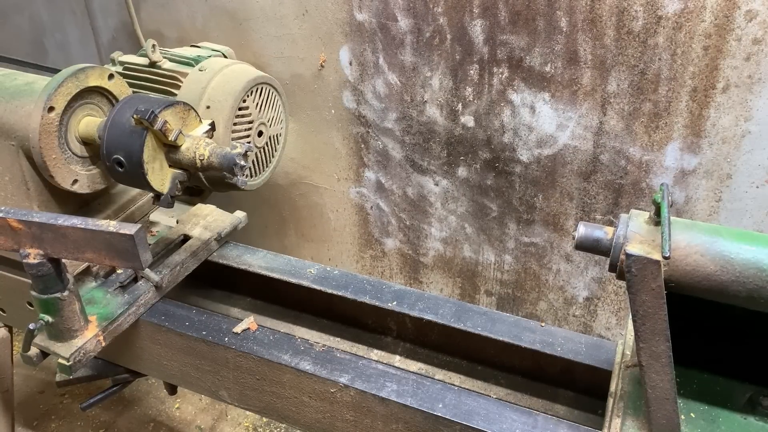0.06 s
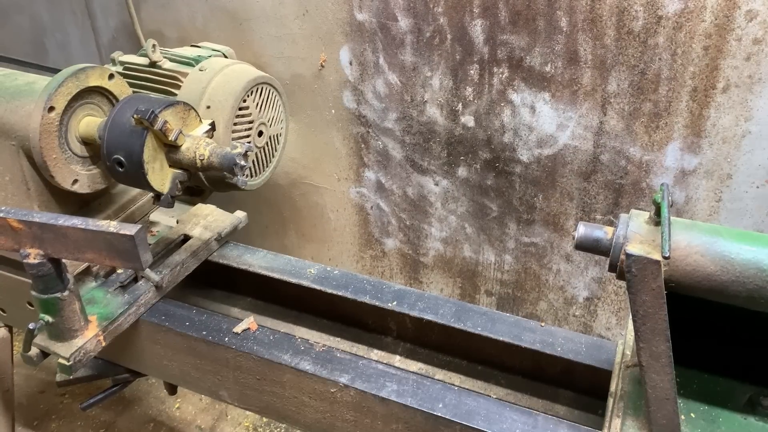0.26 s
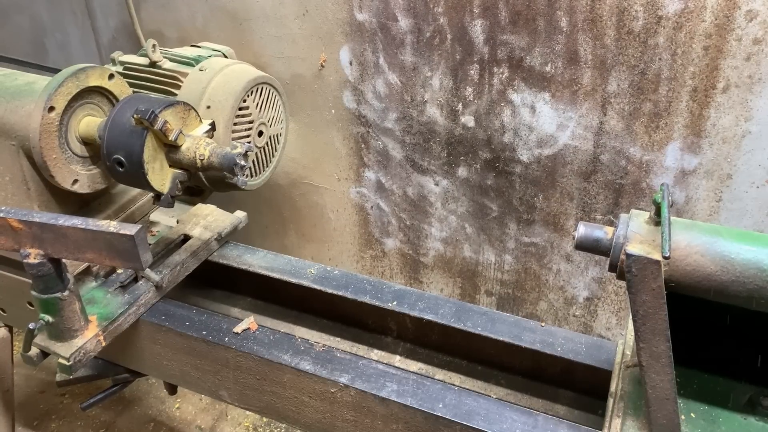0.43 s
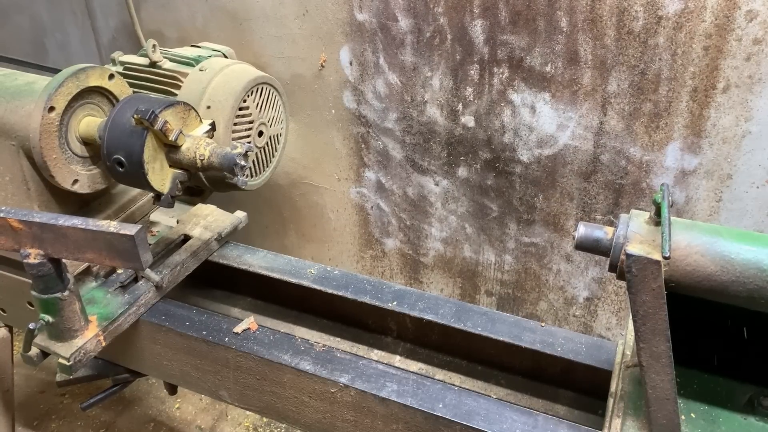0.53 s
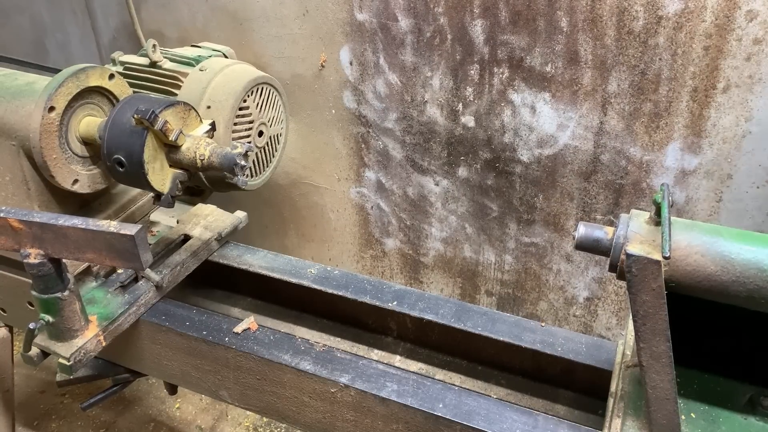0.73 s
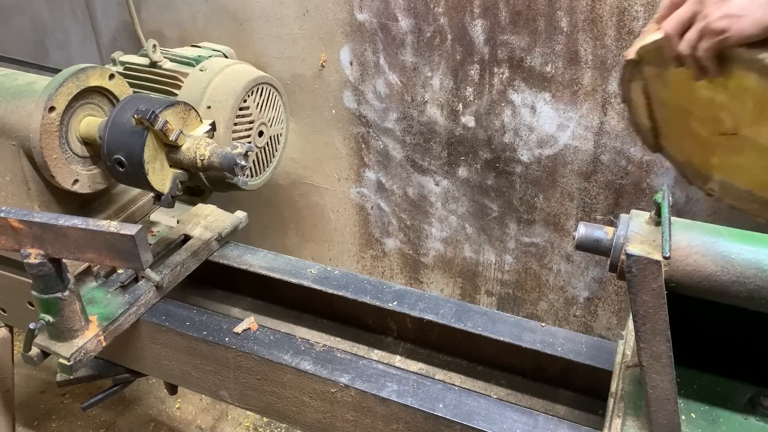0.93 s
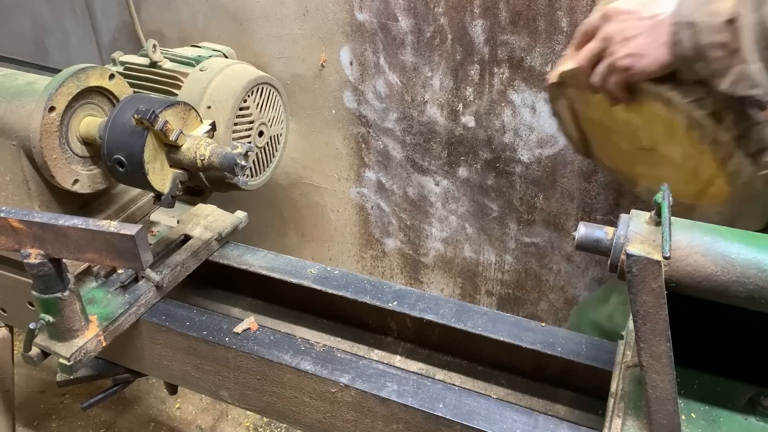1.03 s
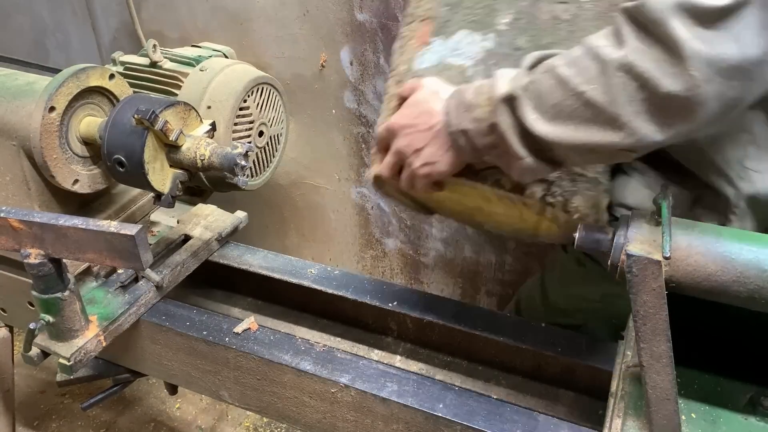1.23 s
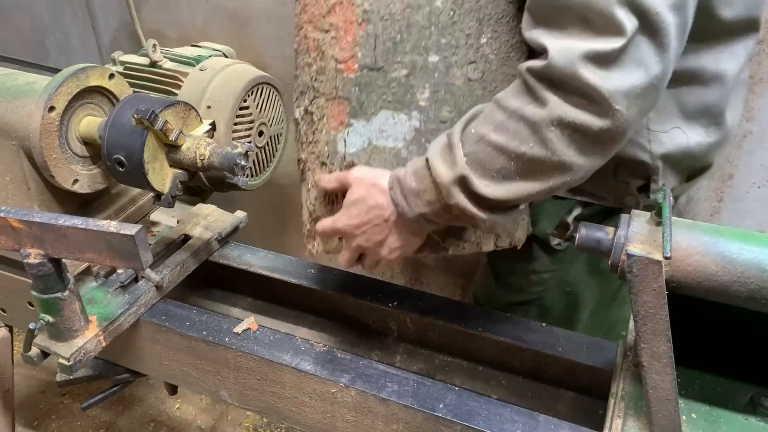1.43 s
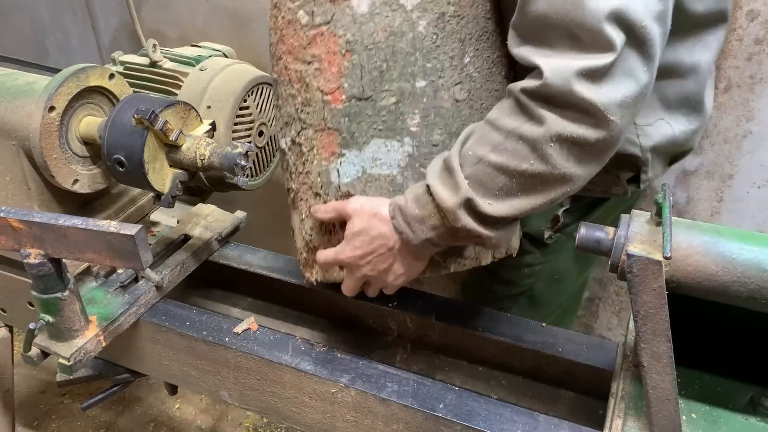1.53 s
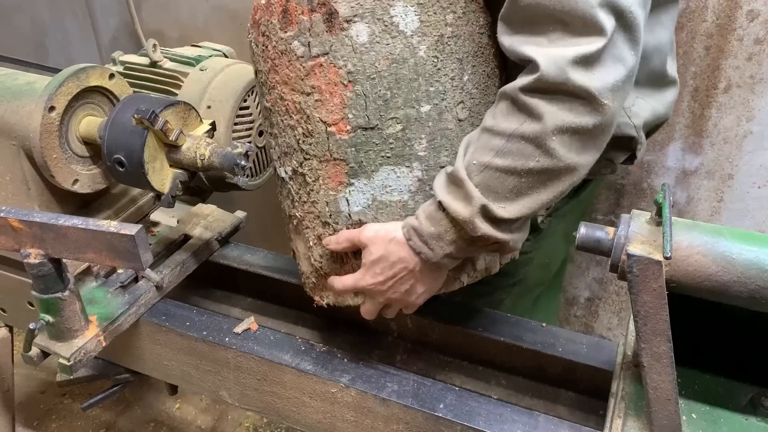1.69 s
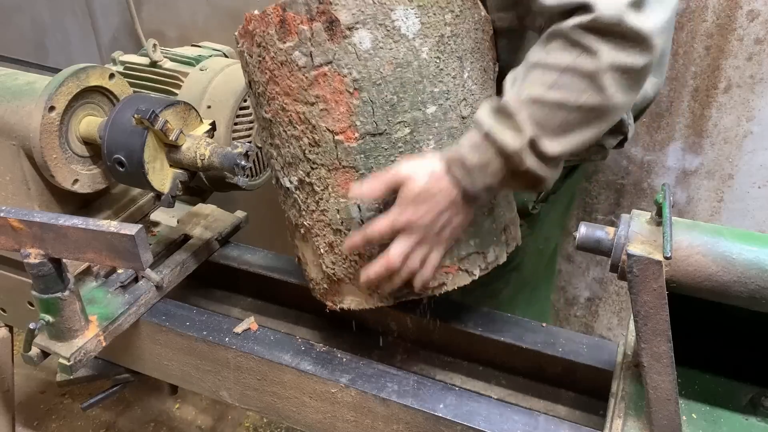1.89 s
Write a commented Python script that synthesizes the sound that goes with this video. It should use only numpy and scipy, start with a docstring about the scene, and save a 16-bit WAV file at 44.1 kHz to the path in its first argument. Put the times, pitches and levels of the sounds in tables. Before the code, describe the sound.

A heavy log hits the floor slightly to the right with a hard crack and short boom, then small squeaks, scrapes, cloth rustle and light knocks as it is carried and positioned; steady low machine hum, short room echo.

```python
"""A low hum fills a hard-walled workshop while sleeves rustle and soft bumps sound; the low rumble swells
softly now and then. A heavy log lands with one loud knock: filtered impulses crack, bark noise crunches,
and decaying sines ring as wood and boom as floor. It is then lifted and carried to a lathe: noise strokes
scuff, short unsteady tones squeak, and the log bumps softly as it is set in place."""
import sys
import numpy as np
from scipy import signal
from scipy.fft import rfft, irfft
from scipy.io import wavfile
from scipy.ndimage import uniform_filter1d

SR = 44100
rng = np.random.default_rng(int(sys.argv[2]) if len(sys.argv) > 2 else 0)


def digitize_waveform(pressure):
    """Quantize a signal to 16-bit integers and store it at the path in sys.argv[1].

    Rows of a 2-D input are taken as channels; values are limited to [-1, 1].
    """
    field = np.atleast_2d(pressure).T
    bounded = np.clip(field, -1, 1)
    quanta = np.round(bounded * 32767).astype(np.int16)
    wavfile.write(sys.argv[1], SR, quanta)


N = 85995
T = np.arange(N) / SR


def amp(db):
    """Decibels to gain."""
    return 10 ** (np.asarray(db) / 20)


def unit(x):
    """Scales to rms 1."""
    return x / np.sqrt(np.mean(x ** 2) + 1e-20)


def read(points, hz):
    """Reads a table on a log-frequency axis."""
    f, value = np.transpose(points)
    return np.interp(np.log(hz + 1), np.log(f + 1), value)


def convolve(x, response):
    """Convolution, channel by channel."""
    return signal.fftconvolve(np.atleast_2d(x), np.atleast_2d(response), axes=1)[:, :N]


def clicks(rows):
    """One impulse for each row of time and level."""
    out = np.zeros(N)
    for s, db in rows:
        out[round(s * SR)] += amp(db)
    return out


def smooth_noise(samples):
    """Slow random curve of rms 1: white noise under a moving average."""
    return unit(uniform_filter1d(rng.standard_normal(N), size=samples))


def noise(colour, tilt_db_per_octave=0, grain_db=0):
    """Coloured, optionally gritty stereo noise of rms 1, its sides partly alike in the bass."""
    # likeness of left and right: (frequency [Hz], correlation [0-1])
    likeness = [(30, 0.28), (100, 0.49), (250, 0.075), (600, 0.043), (2000, 0)]
    hz = np.fft.rfftfreq(N, 1 / SR)
    # grit: a random level held for 32 samples
    grit = np.repeat(rng.standard_normal((2, N // 32 + 1)), 32, axis=1)[:, :N]
    a, b = rfft(rng.standard_normal((2, N)) * amp(grain_db * grit))
    same = np.clip(read(likeness, hz), -1, 1)
    octaves_above_1khz = np.log2(np.maximum(hz, 1000) / 1000)
    gain = amp(read(colour, hz) + tilt_db_per_octave * octaves_above_1khz)
    left_right = np.array([a, same * a + np.sqrt(1 - same ** 2) * b])
    return unit(irfft(left_right * gain, N))


def swell(peak_s, rise_s, fall_s):
    """Exponential rise to a peak, and exponential fall."""
    return np.exp(-np.maximum(peak_s - T, 0) / rise_s - np.maximum(T - peak_s, 0) / fall_s)


def struck(start_s, fall_s):
    """Cushioned linear start, and exponential fall."""
    rise_s = 0.0024
    rise = np.clip((T - start_s) / rise_s, 0, 1)
    return rise * np.exp(-np.maximum(T - start_s - rise_s, 0) / fall_s)


def ring(modes, rise_s):
    """Dying sines of a struck body, eased in."""
    out = np.zeros(N)
    for hz, db, t60_s in modes:
        out += amp(db) * np.exp(-np.log(1000) * T / t60_s) * np.sin(2 * np.pi * hz * T)
    return out * (1 - np.exp(-T / rise_s))


def in_room(x, room_db):
    """The direct sound plus a diffuse noise tail that broadly dies sooner in the treble."""
    # room decay: (frequency [Hz], t60 [s])
    decay = [(60, 0.83), (200, 0.39), (700, 0.28), (1500, 0.29), (4000, 0.19), (8000, 0.15), (15000, 0.09)]
    first_echo_s, echo_grain_db = 0.004, 3
    echoes = noise([(1, 0), (SR, 0)], grain_db=echo_grain_db)[:, :SR]
    hz, t, z = signal.stft(echoes, SR, nperseg=256)
    fade = np.exp(-np.log(1000) * t / read(decay, hz)[:, None])
    tail = signal.istft(z * fade, SR)[1][:, :SR]
    tail = tail * (T[:SR] > first_echo_s)
    return x + amp(room_db) * convolve(x, tail / np.linalg.norm(tail[0]))


def hum():
    """A wavering low sine drone in steady machine noise."""
    # hum and air, with a faint hiss band high up: (frequency [Hz], level [dB])
    hum_colour = [(20, -5.5), (45, -3), (65, -2.5), (85, 7), (115, -1.5), (160, -2.5), (300, -10.5),
                  (1000, -22), (3000, -28), (6500, -39), (7800, -64), (8200, -25.5), (8800, -44),
                  (14000, -50), (16000, -55)]
    noise_db, drone_hz, drone_db, waver_share = -56, 81.7, -73, 0.0356
    pitch_hz = drone_hz * (1 + waver_share * smooth_noise(3000))
    drone = np.sin(2 * np.pi * np.cumsum(pitch_hz) / SR)
    return amp(noise_db) * noise(hum_colour) + amp(drone_db) * drone


def rumble_swells():
    """The low rumble swells softly now and then: bass noise under short exponential swells."""
    # rumble swells, peaking one rise later: (time [s], level [dB])
    swells = [(.027, -53), (.485, -53), (.715, -47), (0.891, -54), (1.081, -51), (1.262, -50.5),
              (1.42, -53.5), (1.85, -49.5)]
    # rumble colour: (frequency [Hz], level [dB])
    rumble_colour = [(30, -11.5), (85, 6), (150, -10), (450, -15), (2000, -43)]
    rise_s, fall_s = 0.0089, 0.024
    envelope = sum(amp(db) * swell(s + rise_s, rise_s, fall_s) for s, db in swells)
    return noise(rumble_colour) * envelope


def rustle():
    """Sleeves and bark against the jacket: grainy cloth noise with a random flutter in level."""
    # rustle level: (time [s], level [dB])
    rustle_level = [(0, -67), (.12, -63), (.33, -67), (.5, -64.5), (.7, -68.5), (.8, -62.5), (.98, -65),
                    (1.03, -59.5), (1.32, -62), (1.45, -57), (1.52, -59.5), (1.58, -71.5), (1.75, -64.5),
                    (1.9, -69)]
    # cloth colour: (frequency [Hz], level [dB])
    cloth = [(80, 5), (220, 13), (500, 6.5), (3500, 0), (5500, -4), (8000, -4.5), (13000, -14),
             (16000, -21)]
    flutter_db = 1.3 * smooth_noise(1100)
    level_db = np.interp(T, *np.transpose(rustle_level)) + flutter_db
    return amp(level_db) * noise(cloth, grain_db=3.0)


def squeaks():
    """Soles and bark: short, unsteady sine whistles, some sagging in pitch."""
    # squeaks: (middle [s], half-length [s], middle pitch [Hz], pitch lost per half-length [share], level [dB])
    whistles = [(.506, 0.015, 8150, 0, -57.5), (0.523, 0.016, 7080, .01, -62),
                (0.578, 0.0144, 4650, .11, -54), (1.694, 0.0062, 4850, .06, -55.5),
                (1.709, 0.011, 5400, 0, -60.5)]
    jitter_share, room_db = 0.0191, -4
    out = np.zeros(N)
    for middle_s, half_s, hz, sag, db in whistles:
        along = np.clip((T - middle_s) / half_s, -1, 1)
        jitter = jitter_share * smooth_noise(30)
        turns = np.cumsum(hz * (1 - sag * along + jitter)) / SR
        out += amp(db) * np.cos(np.pi / 2 * along) ** 2 * np.sin(2 * np.pi * turns)
    return in_room(out, room_db)


def patchy(x):
    """Lets narrow bands flare and fade at random, as a rubbed surface catches and slips."""
    patch_db = 3
    z = signal.stft(x, nperseg=512)[2]
    patches = rng.standard_normal(z.shape[1:])
    patches = uniform_filter1d(patches, 2, 0)  # across frequency
    patches = unit(uniform_filter1d(patches, 4, 1))  # across time
    return signal.istft(z * unit(amp(patch_db * patches)))[1][:, :N]


def scuffs():
    """Soles and bark: strokes of clumped grit that swell and fade, each with rasping resonances."""
    # strokes: (peak [s], rise [s], fall [s], level [dB], tilt above 1 kHz [dB/octave], rasp pitch [Hz])
    strokes = [(0.417, 0.014, 0.012, -41.5, -9.5, 2060), (0.422, 0.011, 0.019, -45, 1, 3030),
               (0.893, 0.025, 0.021, -48.5, -2, 2160), (0.89, 0.003, 0.016, -43.5, -4.5, 2150),
               (0.936, 0.014, 0.012, -49.5, -8, 1540), (1.389, 0.0053, 0.013, -44.5, 5.5, 7870),
               (1.66, 0.014, 0.015, -55, -2, 2530), (1.697, 0.023, 0.03, -57, 1.5, 5180),
               (1.95, 0.016, .02, -56.5, -1, 1910)]
    # scuff colour: (frequency [Hz], level [dB])
    scuff_colour = [(200, -4), (1000, -13.5), (1600, -2.5), (2200, 1.5), (3400, 1.5), (5000, -3),
                    (8500, -3), (13000, -9), (16000, -15.5)]
    # rasp resonances: (multiple of the rasp pitch [ratio])
    rasp_ratios = [0.99, 1.38, 1.646]
    rasp_db, rasp_octaves = 7.5, 0.037
    grain_db, clump_db, room_db = 3, 2, -6
    hz, out = np.geomspace(100, 16000, 200), np.zeros((2, N))
    for peak_s, rise_s, fall_s, db, tilt, rasp_hz in strokes:
        colour = read(scuff_colour, hz)
        for ratio in rasp_ratios:
            octaves_off = np.log2(hz / (ratio * rasp_hz))
            colour = colour + rasp_db * np.exp(-(octaves_off / rasp_octaves) ** 2)
        out += amp(db) * swell(peak_s, rise_s, fall_s) * noise(np.c_[hz, colour], tilt, grain_db)
    clumps = unit(amp(clump_db * smooth_noise(200)))
    return in_room(patchy(out * clumps), room_db)


def bumps():
    """Log and boots: each bump is a hollow knock of three close modes, and a noise tick."""
    # bumps: (time [s], knock level [dB], knock pitch [Hz], knock fall [s], tick level [dB])
    contacts = [(.027, -64, 730, 0.0086, -53), (.338, -44, 503, 0.016, -63), (.372, -47, 1032, 0.0049, -61),
                (.722, -63.5, 1960, 0.016, -58.5), (.737, -51.5, 588.5, .012, -98),
                (.948, -55, 420, 0.017, -59), (1.048, -54, 295, 0.008, -73), (1.191, -53.5, 897, 0.02, -58),
                (1.219, -51, 288, 0.0085, -72), (1.383, -55.5, 783, 0.0072, -53.5),
                (1.641, -52, 429, 0.027, -59), (1.679, -48.5, 434.6, 0.023, -52.5),
                (1.707, -42, 256.4, .014, -54.5), (1.7121, -39, 1050, 0.002, -68),
                (1.843, -51, 955, 0.0054, -58)]
    # tick colour: (frequency [Hz], level [dB])
    tick_colour = [(200, 8), (2500, 6.5), (5000, -6.5), (15000, -58)]
    tick_fall_s, mode_spread, room_db = 0.022, 0.165, -8
    tick, out = noise(tick_colour), np.zeros((2, N))
    for s, knock_db, hz, fall_s, tick_db in contacts:
        phase = 2 * np.pi * hz * (T - s)
        knock = np.sin(phase)
        knock += .5 * np.sin(phase * (1 + mode_spread))
        knock -= .5 * np.sin(phase * (1 - mode_spread))
        out += amp(tick_db) * struck(s, tick_fall_s) * tick
        out += amp(knock_db) * struck(s, fall_s) * knock
    return in_room(out, room_db)


def floor_boom():
    """The floor answers the landing and the rocking with low modes."""
    # landing and rocking: (time [s], level [dB])
    thumps = [(.211, -3), (.226, 3.5), (.305, -5.5), (.328, -5), (.364, -7)]
    # floor modes: (frequency [Hz], level [dB], t60 [s])
    floor_modes = [(33, -42, 0.53), (52.7, -35, 0.29), (62.8, -37, 0.22), (112.75, -35, 0.25),
                   (119, -31.5, 0.12), (222.6, -39.5, 0.13), (366.4, -43, 0.12)]
    boom = convolve(clicks(thumps), ring(floor_modes, rise_s=0.0067))
    return in_room(boom, room_db=-12)


def bark_crunch():
    """Bark at the rim is crushed as the weight arrives: one short swell of gritty noise."""
    # crushed bark colour: (frequency [Hz], level [dB])
    bark = [(200, 5), (1000, 1.5), (2500, 6), (5000, -7), (12000, -6.5), (16000, -11.5)]
    crush = amp(-22) * swell(peak_s=.2098, rise_s=.0022, fall_s=0.0051)
    return in_room(crush * noise(bark, grain_db=1.5), room_db=-8.5)


def from_right(x, left_db):
    """Places a sound on the right: the left channel is late and weaker."""
    left_late_s = 0.000679
    return np.array([amp(left_db) * np.interp(T - left_late_s, T, x), x])


def log_knock():
    """Quick contacts crack against the floor as minimum-phase pulses, and the log's modes ring."""
    # contacts of the log's end as it lands: (time [s], level [dB])
    blows = [(.2098, -26), (.2111, -28), (.2124, 0.5), (.2171, -23), (.2215, -18.5)]
    # hard contact spectrum: (frequency [Hz], level [dB])
    crack_colour = [(60, -19.5), (230, 4), (420, -4.5), (750, 5.5), (1200, -3), (1700, -7), (2400, -11),
                    (4000, -14.5), (8000, -16.5), (16000, -18)]
    # landing, then a light double bump as it is carried: (time [s], level [dB])
    knocks = [(.2112, 0.5), (1.19, -27.5), (1.207, -36.5)]
    # log modes: (frequency [Hz], level [dB], t60 [s])
    log_modes = [(479, -26, 0.089), (638, -23, 0.11), (729, -35, 0.089), (773, -32.5, 0.13),
                 (790, -12, 0.025), (852, -48, 0.13), (992, -40, 0.37), (1190, -40.5, 0.26),
                 (1323, -37, 0.16), (1445, -37.5, 0.18), (1594, -37, 0.091), (1644, -19.5, 0.027),
                 (2275, -55, 0.081), (2822, -34, 0.036)]
    crack_db = 8.5
    log_gain = np.log(amp(read(crack_colour, abs(np.fft.fftfreq(4096, 1 / SR)))))
    spectrum = np.exp(np.conj(signal.hilbert(log_gain)))  # minimum phase
    pulse = np.fft.ifft(spectrum).real
    crack = amp(crack_db) * convolve(clicks(blows), pulse)[0]
    wood = convolve(clicks(knocks), ring(log_modes, rise_s=0.00029))[0]
    crack_in_room = in_room(from_right(crack, left_db=-1.5), room_db=-1)
    wood_in_room = in_room(from_right(wood, left_db=-3.5), room_db=-8.5)
    return crack_in_room + wood_in_room


def scene():
    """Everything together, a little stronger on the right."""
    left_db = -1.19
    mix = hum() + rumble_swells() + rustle() + squeaks() + scuffs() + bumps()
    mix = mix + floor_boom() + bark_crunch() + log_knock()
    return mix * amp([[left_db], [0]])


def record(dry):
    """The recorder's steep band limit: a linear-phase low-pass."""
    edge_hz = 16200
    lowpass = signal.firwin(511, edge_hz, window=("kaiser", 9), fs=SR)
    return signal.oaconvolve(dry, lowpass[None], "same")


dry = scene()
out = record(dry)
digitize_waveform(out)
```